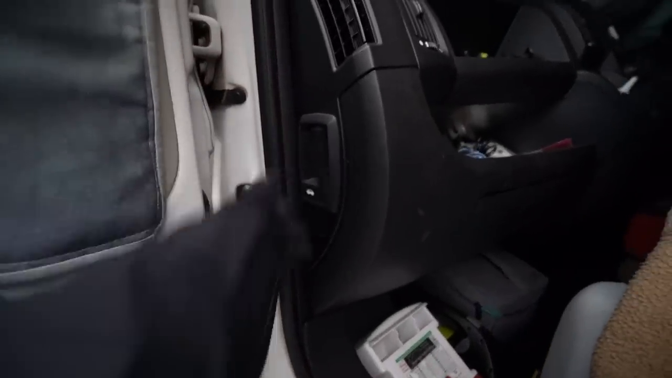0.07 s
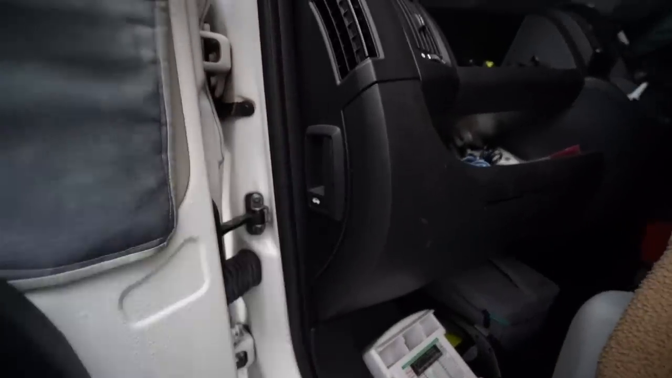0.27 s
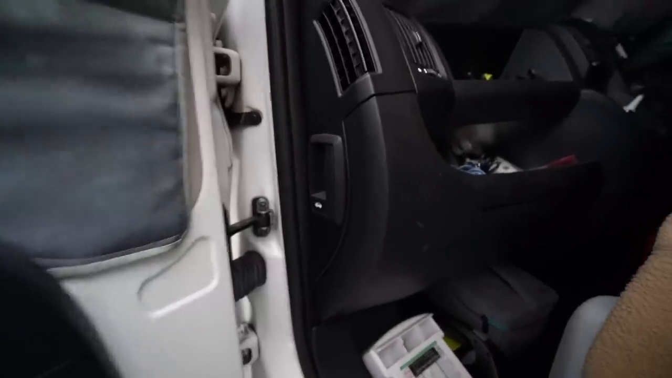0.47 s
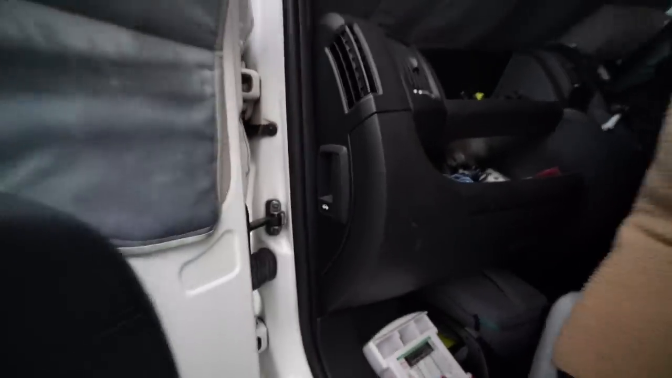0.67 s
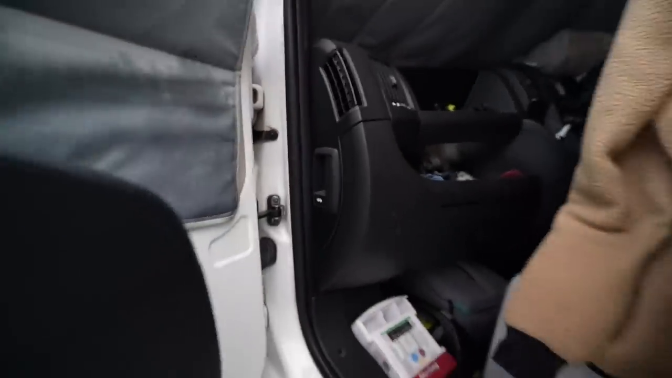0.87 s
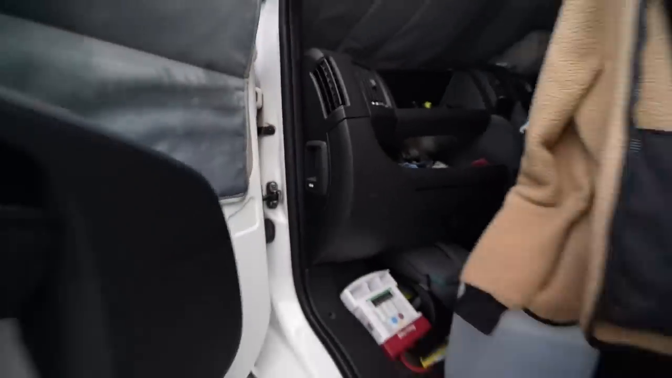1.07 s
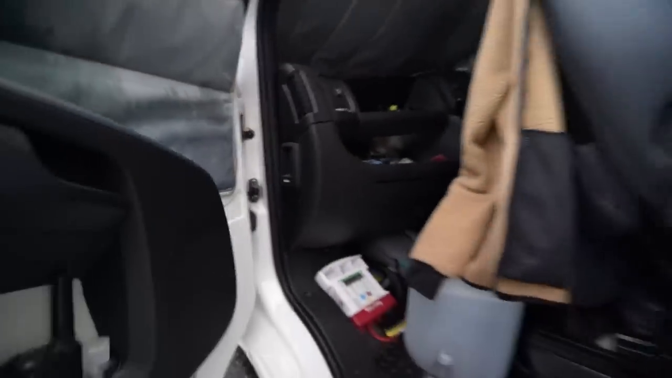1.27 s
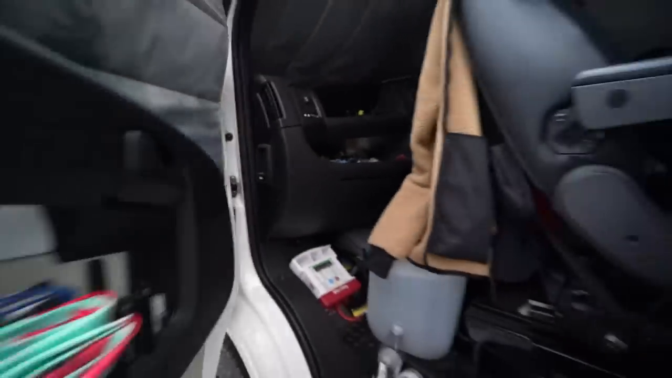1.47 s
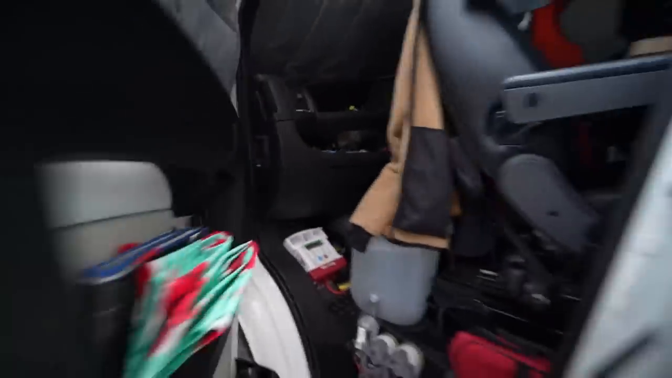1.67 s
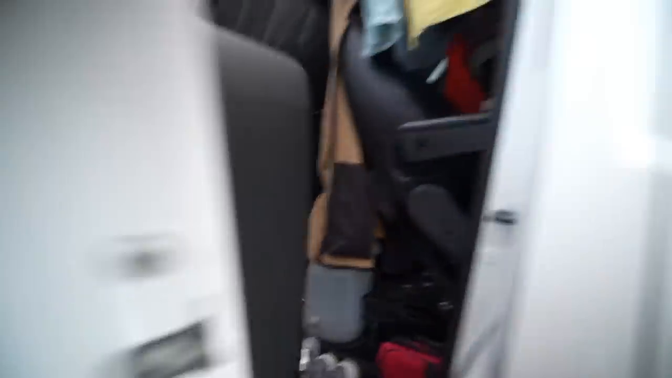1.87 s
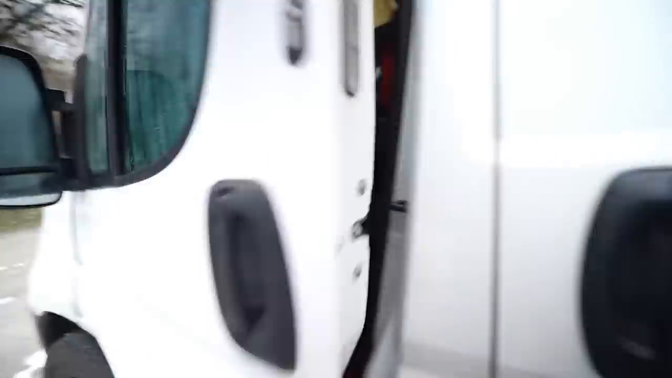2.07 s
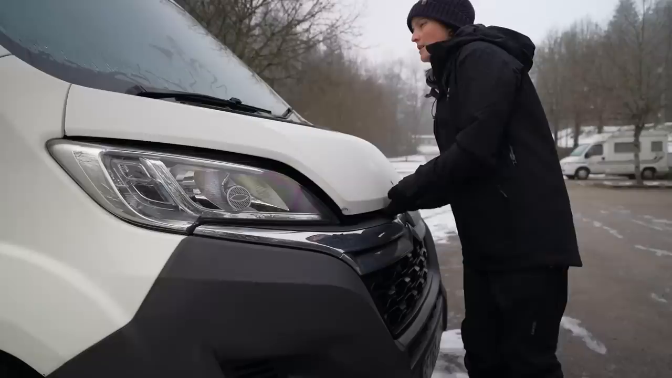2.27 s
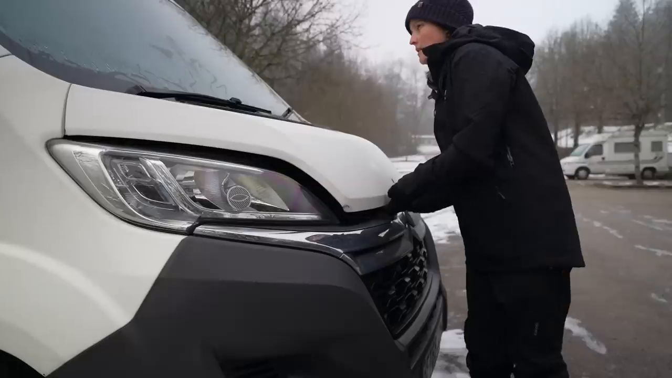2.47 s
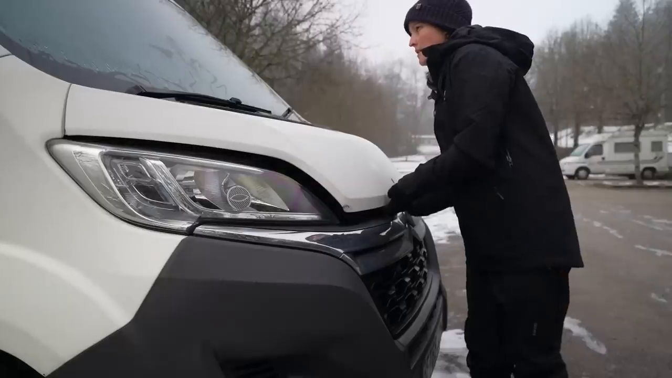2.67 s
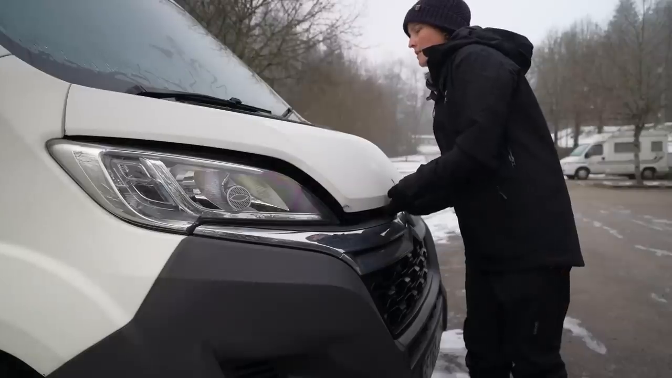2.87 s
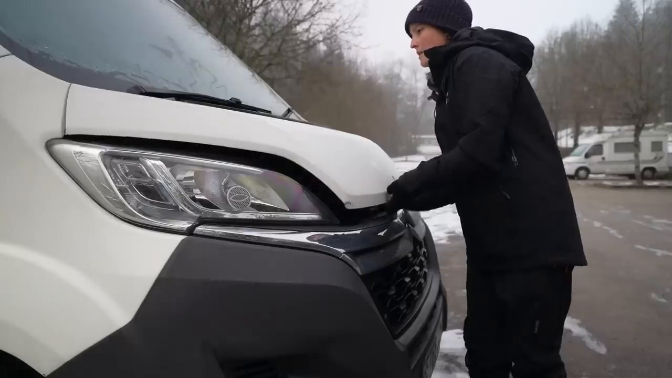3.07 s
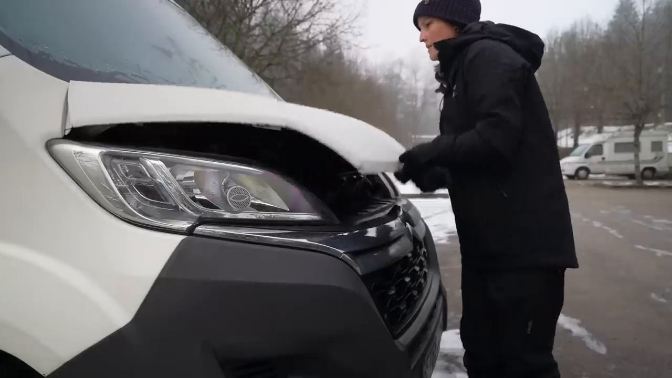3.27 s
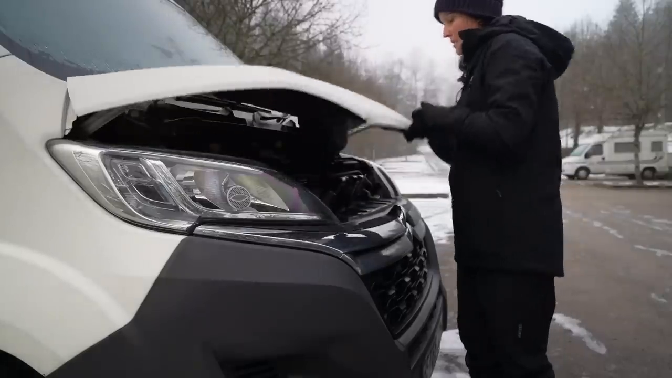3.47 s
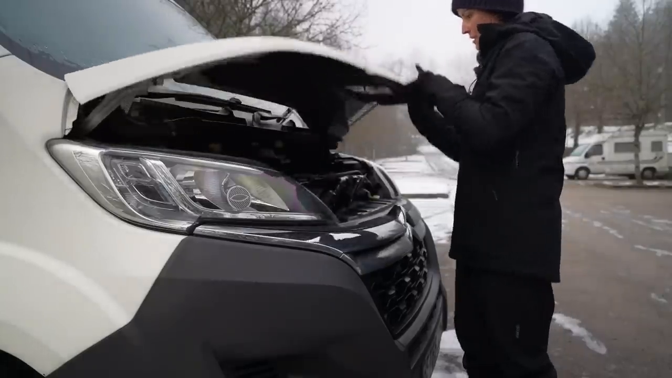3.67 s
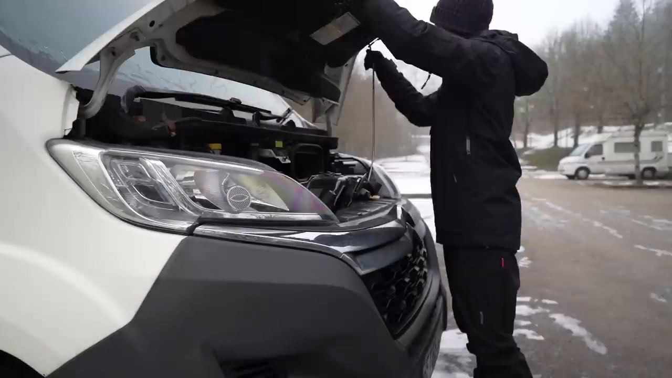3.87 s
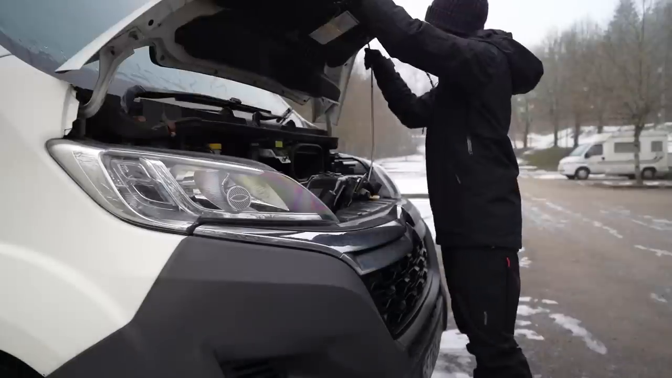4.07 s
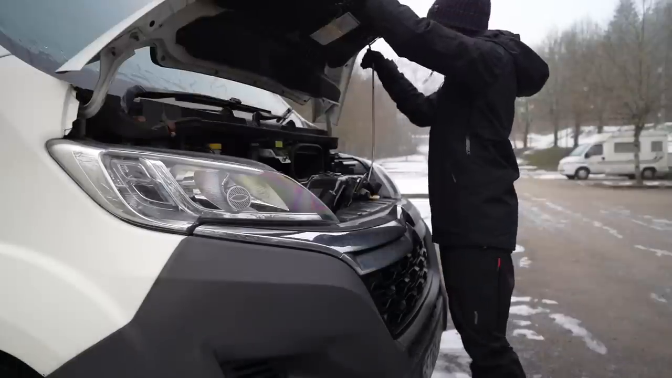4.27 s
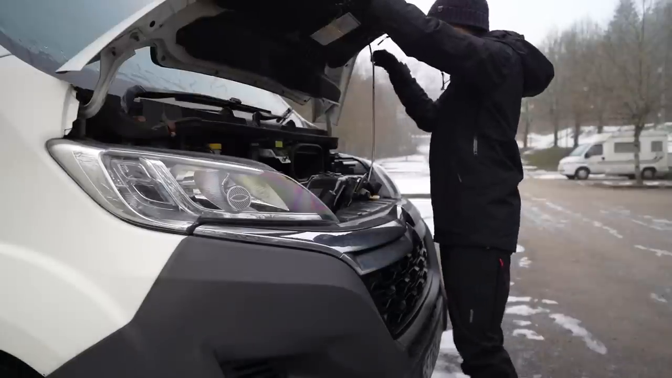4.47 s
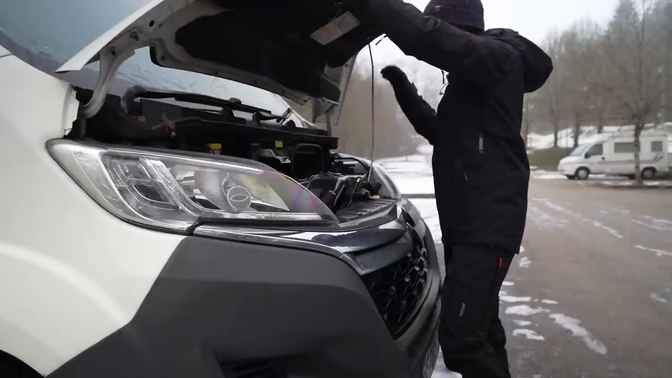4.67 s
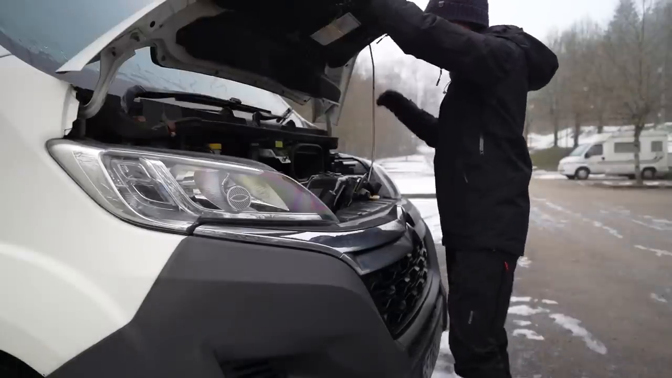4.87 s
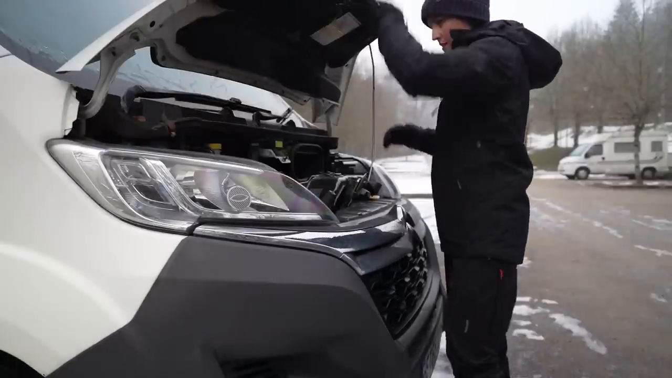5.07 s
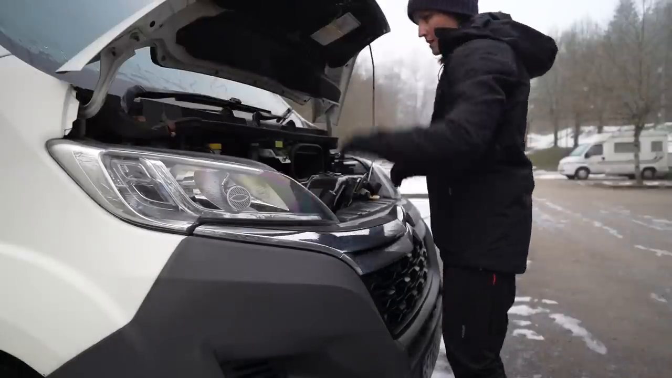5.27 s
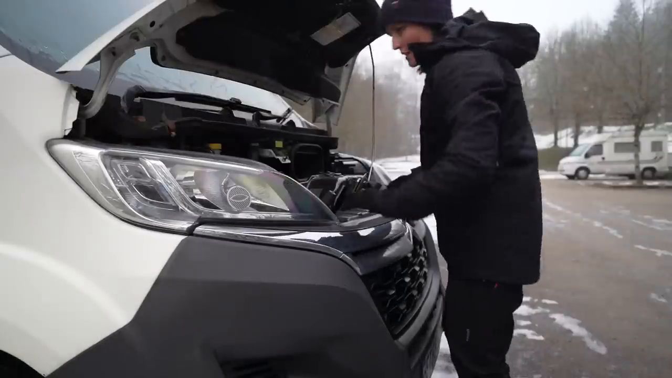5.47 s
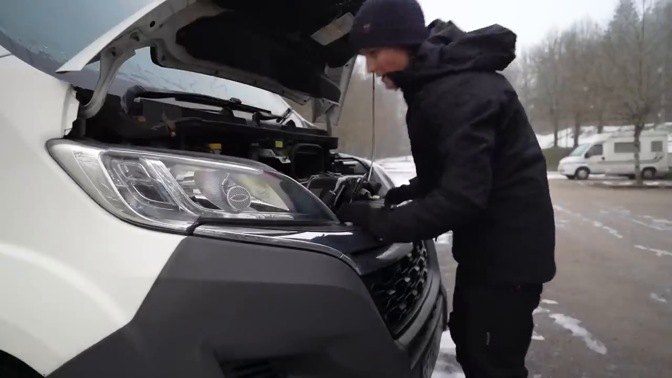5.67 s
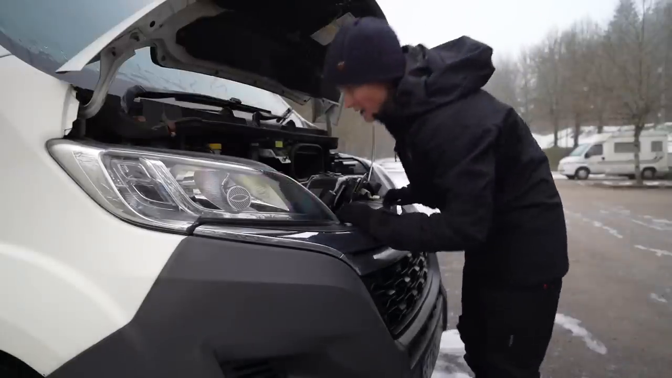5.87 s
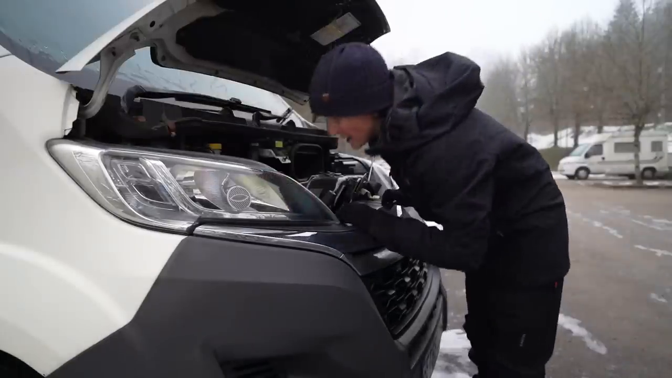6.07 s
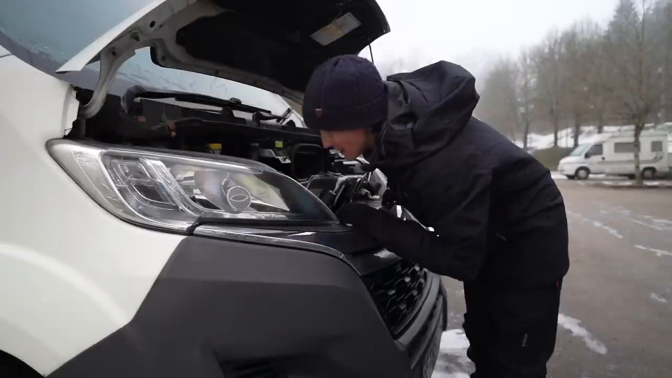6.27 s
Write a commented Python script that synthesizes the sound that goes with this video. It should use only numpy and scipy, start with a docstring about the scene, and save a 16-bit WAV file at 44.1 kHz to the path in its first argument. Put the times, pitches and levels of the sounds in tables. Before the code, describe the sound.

Quiet open car park with faint, steady distant traffic, miked close. At 0.1 s a bonnet release lever snaps hard in the cab footwell, rebounding several times within 0.05 s. A nylon sleeve swishes at 0.2, then plastic trim knocks and scrapes from 0.3 to 0.8. Soft padded thuds and small creaks continue from 0.9 to 2.1, with low air buffeting on the moving microphone. At 2.2 the cab door slams: metallic latch, heavy panel thump and a rattle lasting until about 2.36. Light bonnet tugs and jacket rustle come around 2.5; the safety catch clunks free with a short ring at 2.9, and the steel bonnet jolts strongly at 3.2. Near quiet follows until the prop clacks home at 4.06 with a brief ring. Two tiny bird chirps sound at 4.4 and 4.6, then light ticks, rubbing and rustling from 4.9 to 6.3.

```python
"""Open car park, a van: distant traffic and a far bird behind a snapping bonnet release and a cab door slam.
Then the safety catch is freed, the bonnet jolts, its prop clacks home and small parts tick under the hands.
Each blow is a minimum-phase crack, a wash of decaying noise bands, a few damped modes and a faint tail.
Traffic, buffeting, scuffing and the rustling nylon jacket are coloured, fluttering noise; the sleeve's swish
is band-passed noise; scrapes are random clicks through a plastic ring; chirps are sliding sines."""
import sys
import numpy as np
from scipy import signal
from scipy.fft import rfft, irfft
from scipy.io import wavfile

SR = 44100
rng = np.random.default_rng(int(sys.argv[2]) if len(sys.argv) > 2 else 0)


def wav_record(signal):
    """Record a signal, one row per channel, as 16-bit PCM in the file named by sys.argv[1]."""
    frames = np.transpose(np.atleast_2d(signal))
    bounded = np.clip(frames, -1, 1)
    # unit amplitude maps onto the largest positive 16-bit level
    quanta = np.round(bounded * 32767).astype(np.int16)
    wavfile.write(sys.argv[1], SR, quanta)


N = 278267
AGE_S = np.arange(int(0.7 * SR)) / SR   # time since a contact
BAND_HZ = 25 * 2 ** (np.arange(29) / 3)
BAND_EDGE = 2 ** (1 / 6)   # half a third-octave, as a ratio


def from_db(db):
    """Decibels to gain."""
    return 10 ** (np.asarray(db) / 20)


def fading(t60_s):
    """Exponential envelope losing 60 dB in t60_s."""
    return np.exp(-np.log(1000) * AGE_S / np.maximum(t60_s, 1e-3))


def at_hz(points, hz):
    """Read a table on a log-frequency axis."""
    point_hz, value = np.transpose(points)
    return np.interp(np.log(hz), np.log(point_hz), value)


def in_time(rows):
    """Join the points of a curve by straight lines."""
    return np.interp(np.arange(N) / SR, *np.transpose(rows))


def unit_blow(x):
    """Scale a sound to the energy of 10 ms at rms 1."""
    return x / np.sqrt(np.sum(x ** 2) / (SR / 100) + 1e-20)


def add(out, start_s, sound):
    """Mix a sound in from start_s."""
    part = out[int(start_s * SR):][:len(sound)]
    part += sound[:len(part)]


def noise_bands():
    """Third-octave bands of white noise; neighbours are unrelated."""
    white = rng.standard_normal((2, N + len(AGE_S)))
    bands = []
    for k, hz in enumerate(BAND_HZ):
        sos = signal.butter(2, [hz / BAND_EDGE, hz * BAND_EDGE], "band", fs=SR, output="sos")
        bands.append(signal.sosfilt(sos, white[k % 2]))
    return np.array(bands)


def rushing(bands, colour, level_db, flutter_db, flutter_per_s):
    """Coloured noise whose level flutters at random about level_db."""
    noise = from_db(at_hz(colour, BAND_HZ)) @ bands[:, -N:]
    flutter = np.interp(np.arange(N) / SR * flutter_per_s, np.arange(N), rng.standard_normal(N))
    return noise / np.std(noise) * from_db(level_db + flutter_db * flutter)


def crack(band_db, flex_hz, flex_db):
    """First wave of a contact: a causal, minimum-phase click that swings at the panel's flexing frequency."""
    size = 4096
    octaves = np.log2(BAND_HZ / flex_hz)
    swing_db = flex_db * np.exp(-2 * octaves ** 2) + 10 * np.minimum(octaves + 1, 0)
    hz = np.maximum(np.fft.rfftfreq(size, 1 / SR), 1)
    spectrum_db = np.interp(np.log(hz), np.log(BAND_HZ), band_db + swing_db)
    cepstrum = irfft(np.log(from_db(spectrum_db)))
    causal = np.r_[cepstrum[0], 2 * cepstrum[1:size // 2]]   # folding gives minimum phase
    return np.pad(irfft(np.exp(rfft(causal, size))), (0, len(AGE_S) - size))


def mode(hz, t60_s):
    """One damped mode that builds up over its first cycle."""
    return signal.lfilter(*signal.iirpeak(hz, 2, fs=SR), fading(t60_s) * np.sin(2 * np.pi * hz * AGE_S))


def ringing(modes, t60_at_500hz_s, bright):
    """Clear modes of a struck body: alternating signs, high ones die sooner, strengths vary per contact."""
    total = np.zeros(len(AGE_S))
    for k, (hz, db) in enumerate(modes):
        gain = from_db(db + bright * np.log2(hz) + rng.normal(0, 1))
        total += (-1) ** k * gain * mode(hz, t60_at_500hz_s * (500 / hz) ** 0.4)
    return unit_blow(total)


def chatter(rate_per_s=320, depth_db=3):
    """Loose parts buzz against each other, so the wash of a blow comes in uneven grains."""
    grains = np.interp(AGE_S * rate_per_s, np.arange(len(AGE_S)), rng.standard_normal(len(AGE_S)))
    return from_db(depth_db * grains)


def struck(bands, hits, colour, low_t60_s, high_t60_s, crack_db, tail_db, tail_t60_s,
           modes, modes_db, ring_t60_s, rise_s=0.0019, flex_hz=500, flex_db=2):
    """Each blow: a crack, a wash of dense modes whose treble dies first, clear modes and a faint tail."""
    # low_t60_s holds at 200 Hz, high_t60_s at 8 kHz, ring_t60_s at 500 Hz
    t60_s = np.exp(at_hz([(200, np.log(low_t60_s)), (8000, np.log(high_t60_s))], BAND_HZ))
    body = np.array([unit_blow(fading(t)) for t in t60_s])
    tail = np.array([unit_blow(fading(tail_t60_s * np.sqrt(t / t60_s[0]))) for t in t60_s])
    envelope = np.hypot(body, from_db(tail_db) * tail) * (1 - np.exp(-AGE_S / rise_s))
    out = np.zeros(N)
    for s, level_db, bright in hits:
        at = int(s * SR)
        band_db = at_hz(colour, BAND_HZ) + bright * np.log2(np.maximum(BAND_HZ, 100) / 1000)
        wash = np.einsum("k,kt,kt->t", from_db(band_db), envelope, bands[:, at:at + len(AGE_S)])
        blow = unit_blow(wash * chatter())
        blow += from_db(crack_db) * unit_blow(crack(band_db, flex_hz, flex_db))
        blow += from_db(modes_db) * ringing(modes, ring_t60_s, bright)
        add(out, s, from_db(level_db) * unit_blow(blow))
    return out


def rebounds(hits, gap_s, loss_db, dulling_db, slowing=1, count=1):
    """Further contacts follow each blow, ever weaker and duller; gaps grow by the factor slowing."""
    delays_s = np.r_[0, np.cumsum(gap_s * slowing ** np.arange(count))]
    return [(s + delay_s, db - k * loss_db, bright - k * dulling_db)
            for s, db, bright in hits for k, delay_s in enumerate(delays_s)]


def first_touch(hits, lead_s, softer_db, brighter_db):
    """A lighter graze just ahead of every blow, its brightness shifted in dB per octave."""
    return [(s - lead_s, db - softer_db, bright + brighter_db) for s, db, bright in hits]


def scattered(span_s, level_db, spread_db, bright_db, count):
    """Faint contacts at loose intervals through a span, each with a strength of its own."""
    start, end = span_s
    return [(start + (end - start) * (k + when) / count, level_db + spread_db * (size - .5), bright_db)
            for k, (when, size) in enumerate(rng.random((count, 2)))]


# Traffic spectrum: (frequency [Hz], density [dB per Hz])
TRAFFIC_COLOUR = [(18, -46), (30, -21), (150, -3.5), (600, -6.5), (3700, -20), (4540, -29.5),
                  (15000, -33.5)]


def traffic(bands):
    """Distant traffic: steady coloured noise with a slight wander."""
    return rushing(bands, TRAFFIC_COLOUR, level_db=-63, flutter_db=2.5, flutter_per_s=18)


# Far chirps: (time [s], frequency [Hz], level [dB], length [s])
CHIRPS = [(4.433, 4830, -66, 0.022), (4.615, 4820, -69, 0.028)]


def bird(fall=0.09, waver=0.045):
    """Short thin sines slide down unevenly; fall and waver are fractions of the pitch."""
    out = np.zeros(N)
    for s, hz, level_db, length_s in CHIRPS:
        through = np.linspace(0, 1, int(length_s * SR))
        wobble = np.interp(through, np.linspace(0, 1, 20), rng.standard_normal(20))
        phase = 2 * np.pi * np.cumsum(hz * (1 - fall * through + waver * wobble)) / SR
        add(out, s, from_db(level_db) * np.sin(np.pi * through) * np.sin(phase))
    return out


# Buffeting spectrum: (frequency [Hz], density [dB per Hz])
BUFFET_COLOUR = [(25, 2), (45, 1.5), (75, -3), (140, 7), (300, -11.5), (800, -51)]
# Buffeting strength: (time [s], level [dB])
BUFFET = [(0, -69), (.9, -64), (1.85, -54.5), (2.15, -60.5), (2.3, -40.5), (2.7, -68), (3.7, -95.5),
          (6.3, -83)]


def buffet(bands):
    """Air buffets the moving microphone: slow-fluttering low noise."""
    return rushing(bands, BUFFET_COLOUR, in_time(BUFFET), flutter_db=4.5, flutter_per_s=7.4)


# Trim spectrum, also for scrapes and knocks: (frequency [Hz], density [dB per Hz])
TRIM_COLOUR = [(59, -36.5), (100, -12.5), (867, -5.5), (3050, -8.5), (15000, -38.5)]


def scuff(bands, level_db=-55, fade_db_per_s=11):
    """Dull scuffing, noise that fades as the cab is left behind."""
    fading_db = level_db - fade_db_per_s * np.arange(N) / SR
    return rushing(bands, TRIM_COLOUR, fading_db, flutter_db=5.0, flutter_per_s=52)


# Nylon spectrum: (frequency [Hz], density [dB per Hz])
JACKET_COLOUR = [(500, -4.5), (1500, 0.5), (3200, -4), (5000, -9), (8000, -7.5), (15000, -16.5)]
# Arm and body movements: (start [s], length [s], level [dB], brightness [dB per octave])
MOVES = [(-.02, 0.18, -49, 1), (0.192, 0.28, -60.5, -0.5), (0.534, 0.28, -58.5, -1),
         (1.331, 0.16, -58, -5.5), (2.434, 0.067, -49, -1.5), (3.145, 0.57, -66, -0.5),
         (4.357, 0.28, -69, -1.5), (5.008, 0.5, -62.5, -1), (5.514, 0.61, -69, -1)]


def jacket(bands, attack_s=0.16, release_t60_s=0.39):
    """Nylon rustles with each movement: noise swells and dies away, broken into fine crinkles."""
    t, out = np.arange(N) / SR, np.zeros(N)
    for start, length, level_db, bright in MOVES:
        colour = [(hz, db + bright * np.log2(hz)) for hz, db in JACKET_COLOUR]
        attack = np.clip((t - start) / attack_s, 0, 1)
        release = np.exp(-np.log(1000) * np.maximum(t - start - length, 0) / release_t60_s)
        out += attack * release * rushing(bands, colour, level_db, flutter_db=2.5, flutter_per_s=250)
    return out


# Sleeve sliding along the trim: (time [s], level [dB])
SWISH = [(.12, -59), (.16, -42), (.195, -40.5), (.26, -49), (.4, -83)]


def swish(low_hz=2700, high_hz=5500):
    """A nylon sleeve slides along the trim as the arm pulls back: band-passed noise."""
    sos = signal.butter(2, [low_hz, high_hz], "band", fs=SR, output="sos")
    noise = signal.sosfilt(sos, rng.standard_normal(N))
    return from_db(in_time(SWISH)) * noise / np.std(noise)


# Trim modes, also for knocks: (frequency [Hz], level [dB])
TRIM_MODES = [(470, 4), (880, 0), (1240, -1), (2050, -4), (2900, -3)]
# Cloth and hands over trim and prop: (start [s], length [s], level [dB], brightness [dB per octave])
SCRAPES = [(0.316, 0.072, -43, -0.5), (0.67, 0.031, -44.5, 6), (0.935, .052, -54.5, 4.5),
           (5.032, 0.085, -62.5, 1)]


def scrapes(slips_per_s=2400, slip_spread_db=2.5):
    """Surfaces stick and slip: a swell of uneven clicks, each ringing briefly in hard plastic."""
    out = np.zeros(N)
    for start, length, level_db, bright in SCRAPES:
        size, spread = rng.standard_normal((2, len(AGE_S)))
        pressure = np.sqrt(np.maximum(np.sin(np.pi * AGE_S / length), 0)) * (AGE_S < length)
        slipping = rng.random(len(AGE_S)) < slips_per_s / SR
        slips = slipping * size * from_db(slip_spread_db * spread) * pressure
        band_db = at_hz(TRIM_COLOUR, BAND_HZ) + bright * np.log2(BAND_HZ)
        click = unit_blow(crack(band_db, flex_hz=900, flex_db=7.0))
        ring = from_db(-6.0) * ringing(TRIM_MODES, 0.07, bright)
        rub = signal.fftconvolve(slips, click + ring)
        rms = np.sqrt(np.sum(rub ** 2) / (length * SR) + 1e-20)
        add(out, start, from_db(level_db) * rub / rms)
    return out


# Trim and door check knocking: (time [s], level [dB], brightness [dB per octave])
TRIM_HITS = [(.3125, -41, 1.5), (.325, -42.5, 0), (.3425, -37, 0.5), (.386, -33, -1.5), (.396, -44.5, 6),
             (.419, -45.5, 0.5), (.44, -48.5, -5), (.579, -44, 2), (.592, -40.5, 1), (.614, -41.5, 3),
             (.638, -47.5, 2), (.6845, -36.5, 1), (.707, -41, 2), (.764, -51, -4), (1.578, -50.5, -0.5),
             (1.795, -55.5, 0), (1.828, -53.5, -2), (1.8735, -47.5, 1), (1.928, -51.5, -3),
             (2.172, -49.5, -6.5)]
# Span of the creaks: (start [s], end [s])
CREAKING_S = (.3, 2.2)


def trim(bands):
    """Trim and door check knock, rebound once and creak as the door is handled."""
    knocks = rebounds(TRIM_HITS, gap_s=0.0038, loss_db=9, dulling_db=2.0)
    creaks = scattered(CREAKING_S, level_db=-62, spread_db=16.0, bright_db=0, count=24)
    return struck(bands, knocks + creaks, TRIM_COLOUR, low_t60_s=0.058, high_t60_s=0.0057, crack_db=-7.0,
                  tail_db=-6.0, tail_t60_s=0.09, modes=TRIM_MODES, modes_db=-1.0, ring_t60_s=0.03)


# Padded blows as feet and door move: (time [s], level [dB], brightness [dB per octave])
THUDS = [(0.932, -42, 7), (1.028, -44, -11), (1.136, -54.5, 8.5), (1.229, -34, 4.5), (1.27, -40, 3.5),
         (1.398, -44.5, -1), (1.456, -45.5, 12), (1.568, -45.5, 4), (1.609, -38.5, -9), (1.692, -41, -2.5),
         (1.79, -46.5, 8), (1.865, -41.5, 14.5), (2.057, -45.5, -15)]
# Thud spectrum: (frequency [Hz], density [dB per Hz])
THUD_COLOUR = [(50, -19.5), (140, -1.5), (290, 2.5), (520, -24), (15000, -110)]
# Cab modes: (frequency [Hz], level [dB])
CAB_MODES = [(133, 2), (216, -7.5), (250, -3), (385, -13.5)]


def thuds(bands):
    """Feet and door move: soft, slow-rising blows ring the low cab modes."""
    return struck(bands, THUDS, THUD_COLOUR, low_t60_s=0.11, high_t60_s=0.017, crack_db=-20,
                  tail_db=-17, tail_t60_s=0.17, rise_s=0.0071,
                  modes=CAB_MODES, modes_db=2.5, ring_t60_s=0.18)


# Hands on catch, prop and engine parts: (time [s], level [dB], brightness [dB per octave])
TICKS = [(3.06, -56, 0.5), (3.133, -47, 2), (4.952, -57, 6), (4.989, -45.5, 4.5), (5.025, -44.5, -3.5),
         (5.038, -56, 5.5), (5.141, -46, .5), (5.282, -48.5, 1.5), (5.411, -46, 1), (5.742, -46, 2),
         (5.748, -43.5, 2), (5.775, -55, -10), (5.826, -52, 0), (6.284, -54, -2)]
# Span of the fiddling: (start [s], end [s])
FIDDLING_S = (4.92, 6.08)
# Tick spectrum: (frequency [Hz], density [dB per Hz])
TICK_COLOUR = [(71, -51), (120, -3), (770, 11.5), (2200, 6), (7000, -12), (15000, -25)]
# Engine bay modes: (frequency [Hz], level [dB])
ENGINE_BAY_MODES = [(866, -7), (1820, 0), (2400, -0.5), (3990, -9.5)]


def ticks(bands):
    """Small parts tick under the hands: short contacts, dulling rebounds and faint fiddling."""
    touches = rebounds(TICKS, gap_s=.005, loss_db=16.5, dulling_db=13.5, slowing=1.6, count=2)
    fiddling = scattered(FIDDLING_S, level_db=-60, spread_db=4, bright_db=-3, count=20)
    return struck(bands, touches + fiddling, TICK_COLOUR, low_t60_s=0.02, high_t60_s=0.014, crack_db=-3.0,
                  tail_db=-15, tail_t60_s=.13, rise_s=0.0016,
                  modes=ENGINE_BAY_MODES, modes_db=-7.0, ring_t60_s=0.053)


# Single notes: (time [s], frequency [Hz], level [dB], t60 [s])
NOTES = [(.974, 4170, -55, 0.026), (1.579, 3520, -52.5, 0.017), (4.066, 710, -30, 0.26),
         (5.056, 1270, -57, 0.022), (6.208, 474, -52, 0.014)]


def ringing_parts():
    """The prop rod and small parts each answer a touch with one damped mode."""
    out = np.zeros(N)
    for s, hz, level_db, t60_s in NOTES:
        add(out, s, from_db(level_db) * unit_blow(mode(hz, t60_s)))
    return out


# Catch letting go: (time [s], level [dB], brightness [dB per octave])
CATCH_HITS = [(2.8845, -22.5, 1.5)]
# Catch spectrum: (frequency [Hz], density [dB per Hz])
CATCH_COLOUR = [(130, -7), (300, 7), (790, -8.5), (1200, 1.5), (1750, -16.5), (2500, -10), (4300, -27),
                (15000, -54.5)]
# Catch modes: (frequency [Hz], level [dB])
CATCH_MODES = [(248, -3), (468, -4), (522, -4), (1034, -2.5), (1125, 3), (1205, 2.5), (1281, 2.5)]


def catch(bands):
    """The safety catch slips free: a bright graze, the blow, then slowing rebounds."""
    graze = first_touch(CATCH_HITS, lead_s=0.002, softer_db=17.0, brighter_db=11)
    blows = rebounds(CATCH_HITS, gap_s=0.00483, loss_db=9.5, dulling_db=2.5, slowing=1.6, count=3)
    return struck(bands, graze + blows, CATCH_COLOUR, low_t60_s=0.35, high_t60_s=0.02, crack_db=-7,
                  tail_db=-14.0, tail_t60_s=0.38, modes=CATCH_MODES, modes_db=5.0, ring_t60_s=.11)


# A rattle after the door slam, then tugs and jolts: (time [s], level [dB], brightness [dB per octave])
BONNET_HITS = [(2.474, -39, 7), (2.522, -33.5, 1), (2.569, -37, 2), (2.801, -47, 3), (3.102, -33.5, -0.5),
               (3.1554, -32.5, 6), (3.2075, -17, 5.5), (3.46, -49.5, -12.5)]
# Bonnet spectrum: (frequency [Hz], density [dB per Hz])
BONNET_COLOUR = [(50, -31), (130, -8.5), (320, 3.5), (1100, -3.5), (3000, -23), (15000, -61)]
# Bonnet modes: (frequency [Hz], level [dB])
BONNET_MODES = [(249, 1), (292, 8.5), (318, 1), (345, 5), (393, 2), (554, -7), (641, -2), (829, -3.5),
                (931, -4.5), (1168, -2), (1432, -7)]


def bonnet(bands):
    """A rattle follows the slam; then the sheet-steel bonnet jolts and settles in ever duller, slower rebounds."""
    graze = first_touch(BONNET_HITS, lead_s=0.0055, softer_db=13.5, brighter_db=0.0)
    blows = rebounds(BONNET_HITS, gap_s=0.012, loss_db=6.5, dulling_db=7.0, slowing=1.4, count=3)
    return struck(bands, graze + blows, BONNET_COLOUR, low_t60_s=0.25, high_t60_s=0.027, crack_db=-11.5,
                  tail_db=-11.5, tail_t60_s=0.42, rise_s=0.00055,
                  modes=BONNET_MODES, modes_db=-1.0, ring_t60_s=.18)


# Prop brushing its seat, then home: (time [s], level [dB], brightness [dB per octave])
PROP_HITS = [(4.039, -48, -5), (4.0605, -34, 0.5), (4.0645, -15.5, 5.5)]
# Prop spectrum: (frequency [Hz], density [dB per Hz])
PROP_COLOUR = [(90, -29.5), (200, -10.5), (450, -1), (2600, -6.5), (3500, -16), (7000, -30), (15000, -60.5)]
# Prop modes: (frequency [Hz], level [dB])
PROP_MODES = [(151, -9.5), (223, -3.5), (342, -3.5), (461, 2.5), (624, 0.5), (825, -1), (955, 0.5),
              (1035, -3.5), (1468, -4), (2505, 0.5), (2976, -4)]


def prop(bands):
    """The prop brushes its seat and clacks home, rebounding at even gaps."""
    graze = first_touch(PROP_HITS, lead_s=0.0027, softer_db=12.5, brighter_db=-1.2)
    blows = rebounds(PROP_HITS, gap_s=0.0037, loss_db=5.0, dulling_db=6.0, count=3)
    return struck(bands, graze + blows, PROP_COLOUR, low_t60_s=0.26, high_t60_s=0.036, crack_db=-5.0,
                  tail_db=-22.5, tail_t60_s=0.55, rise_s=0.0012,
                  modes=PROP_MODES, modes_db=0.0, ring_t60_s=0.14)


# Release snap and rebounds: (time [s], level [dB], brightness [dB per octave])
LEVER_HITS = [(0.103, -9.5, 2.5), (0.12, -12, 1.5), (0.1323, -19.5, 2.5), (0.1416, -19, 0),
              (0.1472, -20, -7)]
# Lever spectrum: (frequency [Hz], density [dB per Hz])
LEVER_COLOUR = [(40, -54.5), (130, -7.5), (300, 2), (600, -5), (1000, -15.5), (2400, -10.5), (3300, -22.5),
                (7900, -28.5), (10000, -37.5)]
# Lever modes: (frequency [Hz], level [dB])
LEVER_MODES = [(296, 5), (345, -5.5), (419, -3.5), (577, 1), (640, -4.5), (1319, -5), (1649, -8.5),
               (1735, -2.5), (2001, -6), (2137, -10), (2417, -4.5), (2714, -12), (7900, -17)]


def lever(bands):
    """The bonnet release lever snaps and rebounds in the footwell."""
    return struck(bands, LEVER_HITS, LEVER_COLOUR, low_t60_s=0.1, high_t60_s=0.026, crack_db=3.0,
                  tail_db=-19.0, tail_t60_s=0.3, flex_hz=634, flex_db=8.0,
                  modes=LEVER_MODES, modes_db=5.5, ring_t60_s=.078)


# Latch striking, closing, chattering: (time [s], level [dB], brightness [dB per octave])
LATCH_HITS = [(2.2221, -13.5, -3.5), (2.23, -22.5, -1), (2.2391, -13, -0.5), (2.2998, -24, -2),
              (2.3189, -27, 1.5), (2.351, -35, 3.5), (2.3615, -45, 3.5)]
# Latch spectrum: (frequency [Hz], density [dB per Hz])
LATCH_COLOUR = [(90, -32.5), (320, 4.5), (900, -0.5), (1550, 0.5), (3300, -19), (6000, -23), (15000, -41.5)]
# Latch modes: (frequency [Hz], level [dB])
LATCH_MODES = [(830, 2.5), (1055, -4), (1160, 2), (1515, 1.5), (1650, -0.5), (2125, -9)]


def latch(bands):
    """The door latch strikes, closes and chatters: short metallic blows."""
    return struck(bands, LATCH_HITS, LATCH_COLOUR, low_t60_s=0.031, high_t60_s=0.025, crack_db=0.5,
                  tail_db=-21.0, tail_t60_s=0.39, modes=LATCH_MODES, modes_db=-2.5, ring_t60_s=.11)


# Door seating and rattling: (time [s], level [dB], brightness [dB per octave])
DOOR_HITS = [(2.2389, -10, -3.5), (2.248, -17, 2.5), (2.2671, -9.5, 2), (2.28, -16.5, -5),
             (2.29, -18, -0.5), (2.3135, -11, 0.5), (2.355, -21.5, -2.5)]
# Door spectrum: (frequency [Hz], density [dB per Hz])
DOOR_COLOUR = [(25, -9.5), (65, -16.5), (130, 7), (600, -3), (1000, -8), (1400, -19), (2200, -12.5),
               (3300, -26), (15000, -48.5)]
# Door modes: (frequency [Hz], level [dB])
DOOR_MODES = [(130, -4.5), (172, -4.5), (243, 0.5), (292, -0.5), (341, 3.5), (410, -2), (491, 2), (534, -5),
              (642, -6.5), (832, -5.5), (1030, -11), (2424, -13)]


def door(bands):
    """The slammed cab door seats and rattles: strong cracks flex the panel."""
    return struck(bands, DOOR_HITS, DOOR_COLOUR, low_t60_s=0.05, high_t60_s=0.039, crack_db=8.0,
                  tail_db=-17, tail_t60_s=0.39, flex_hz=440, flex_db=7.5,
                  modes=DOOR_MODES, modes_db=1.0, ring_t60_s=.16)


def scene(bass_cut_hz=95):
    """Sum of background, handling noise, cab blows and bass-cut bonnet sounds."""
    bands = noise_bands()
    reversed_bands = bands[:, ::-1].copy()   # serves as a second, unrelated noise
    background = traffic(bands) + bird() + buffet(reversed_bands)
    rubbing = scuff(reversed_bands) + jacket(reversed_bands) + swish() + scrapes()
    front = ticks(bands) + ringing_parts() + catch(bands) + bonnet(bands) + prop(bands)
    # an open panel radiates little bass
    front = signal.sosfilt(signal.butter(3, bass_cut_hz, "high", fs=SR, output="sos"), front)
    cab = trim(bands) + thuds(bands) + lever(bands) + latch(bands) + door(bands)
    return (background + rubbing + front + cab)[None]


def record(dry, ceiling=.86, cutoff_hz=15900):
    """Round off the loudest peaks and cut the top."""
    rounded = dry / (1 + (dry / ceiling) ** 4) ** .25
    return signal.sosfilt(signal.ellip(10, .1, 80, cutoff_hz, fs=SR, output="sos"), rounded)


dry = scene()
out = record(dry)
wav_record(out)
```